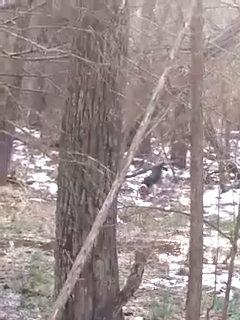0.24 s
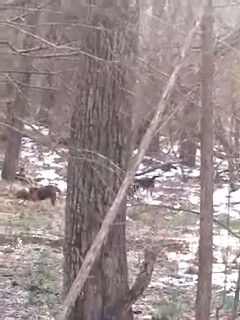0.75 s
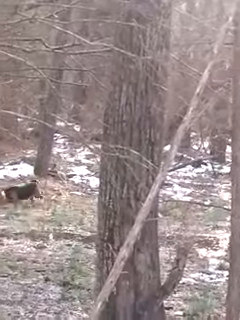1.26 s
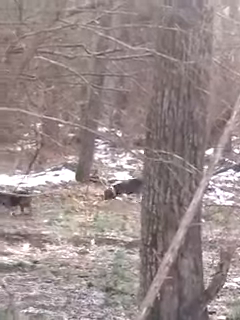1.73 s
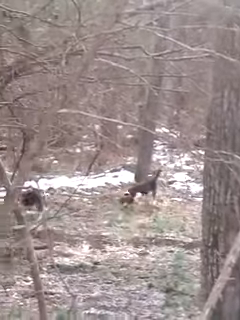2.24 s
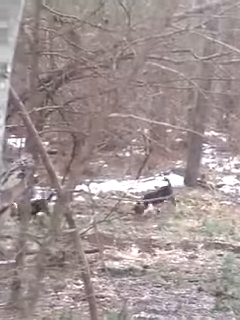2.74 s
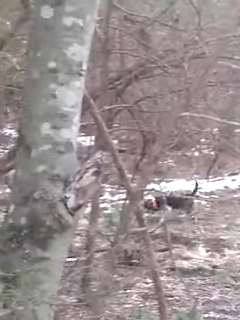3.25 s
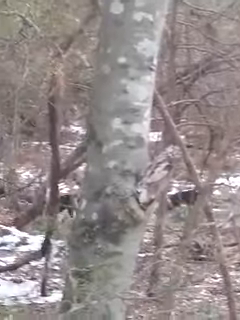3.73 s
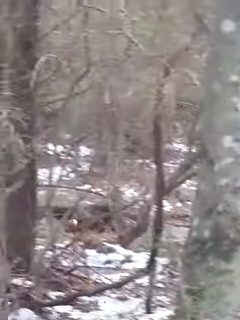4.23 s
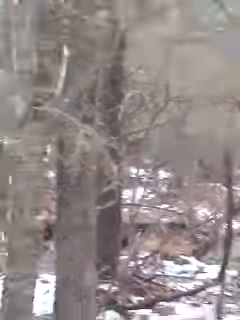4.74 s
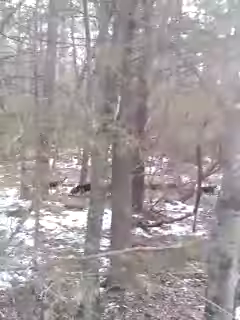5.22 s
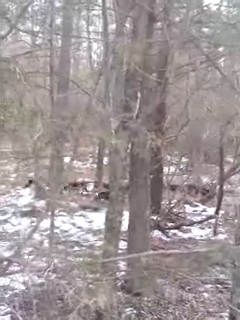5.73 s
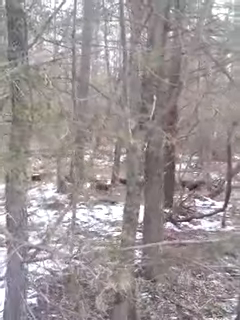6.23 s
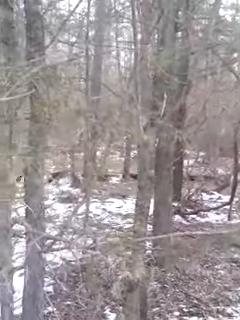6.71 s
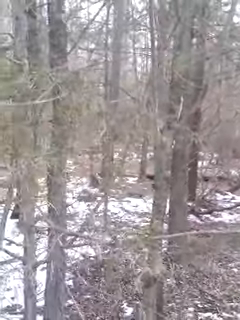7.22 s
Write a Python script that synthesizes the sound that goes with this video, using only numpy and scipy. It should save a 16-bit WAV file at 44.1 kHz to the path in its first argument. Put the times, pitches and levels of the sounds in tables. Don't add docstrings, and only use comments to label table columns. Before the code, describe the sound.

A pack of small hounds is already baying at the start, several voices overlapping at a distance in bare woodland. Howls hold around a mid-high pitch of 600 Hz, with husky yelps sliding above and hoarse barks breaking through. Strong bursts come at 0.9, 1.4 and 1.7 seconds, then a held howl at 2.0 and a yelping bark at 2.5. From about 2.8 to 4.5 the calls are mostly thinner, with a clear howl at 4.2 and the breeze lower. A sharp dry twig cracks very close at 4.55. The loudest clamour follows at 4.95 to 5.4, then bursts at 5.5, 5.8, 6.2 and 6.85, and a faint last yelp near 7.2. Trunks scatter every call into a diffuse ringing tail. Light breeze and hiss continue; small snaps and dull bumps come from the handheld microphone, whose loudest peaks are squashed and gritty.

```python
import sys
import numpy as np
from scipy import signal
from scipy.fft import rfft, irfft, next_fast_len
from scipy.io import wavfile
from scipy.ndimage import uniform_filter1d, minimum_filter1d

SR = 44100
rng = np.random.default_rng(int(sys.argv[2]) if len(sys.argv) > 2 else 0)


def attenuation_scalar(level_db):
    decades = np.asarray(level_db, float) / 20
    return 10 ** decades


def put_to_file(sound):
    columns = np.atleast_2d(sound).T
    safe = np.clip(columns, -1, 1)
    whole_steps = np.round(safe * 32767)
    wavfile.write(sys.argv[1], SR, whole_steps.astype(np.int16))


N = 329427

# time_s, pitch_hz, level_db, octave_level_db
WIDE_HOWLS = [
    [(.328, 553.6, -21.5, -28.5), (.373, 599.7, -12.5, -12.5), (.5, 619.8, -13, -29),
     (.6, 576.8, -20.5, -24), (.67, 539.4, -24.5, -22), (.71, 541.8, -38, -40)],
    [(1.35, 538.8, -27, -33.5), (1.375, 587, -7, -19), (1.402, 618.5, -8, -18), (1.425, 631.2, -9.5, -31),
     (1.528, 611.3, -12.5, -46), (1.58, 553.6, -24.5, -37), (1.61, 566, -30.5, -42)],
    [(2.865, 505.1, -34.5, -34), (2.905, 613.3, -13.5, -19.5), (2.94, 657.5, -12.5, -8.5),
     (2.97, 650.5, -15.5, -15), (3.0, 613, -23, -25.5), (3.04, 597, -31, -37)],
    [(3.668, 529.3, -28, -52), (3.74, 599.7, -23.5, -14), (3.77, 610.3, -18, -15),
     (3.8, 610.4, -15.5, -12.5), (3.85, 602.8, -21, -19.5), (3.875, 591, -33, -37.5)],
    [(4.17, 537.2, -31, -35.5), (4.215, 610.5, -16.5, -12), (4.26, 621.9, -16.5, -27),
     (4.32, 624, -9.5, -38), (4.42, 614.3, -18, -46), (4.5, 589.7, -29.5, -51.5)],
]
THROAT_RING_DB = [-1.5, 5, -5, -9, -4.5]
WIDE_OVERTONES_DB = [0.5, -16, -8.5]
# start_s, length_s, top_pitch_hz, level_db, overtones_db
NARROW_HOWLS = [(-.05, .25, 582.8, -16, -15.5), (0.93, .22, 607.4, -13.5, -17),
                (2.03, .345, 636, -8.5, -30), (2.36, .045, 600, -15, -20), (2.4, .07, 610, -18, -20),
                (3.03, .49, 626.3, -27, -13), (4.56, .17, 608.6, -16.5, -22), (5.03, .24, 630.5, -9, -22),
                (5.235, .16, 641.8, -6.5, -32.5), (5.517, .09, 600, -11.5, -23), (5.82, .18, 605, -14, -23),
                (6.218, .44, 620.5, -19.5, -11), (6.852, .12, 621.5, -17, -22)]
# scoop_share, scoop_s, sag_share, rise_s, fade_db, closing_db
NARROW_ARCH = (0.09, 0.03, 0.0747, 0.1446, -11.5, -4)
NARROW_OVERTONES_DB = [0, -12.5, -7]
# start_s, length_s, first_pitch_hz, last_pitch_hz, level_db
YELPS = [(.04, .16, 792.9, 641.2, -14.5), (.37, .12, 736, 822, -19), (.47, .15, 826.2, 759.2, -15),
         (.845, .12, 780.2, 624.1, -9), (.95, .2, 650.3, 680, -10), (1.675, .15, 799, 669, -11),
         (1.795, .22, 680, 710.4, -8), (2.525, .035, 681, 951, -10.5), (2.555, .04, 861, 778.2, -9.5),
         (3.225, .045, 859.6, 829, -11), (4.96, .06, 1000, 830, -13), (5.0, .11, 880, 700, -8),
         (5.56, .12, 700.1, 670.9, -13), (6.155, .1, 783.7, 668.2, -10), (6.24, .11, 763.1, 799.9, -13.5),
         (6.895, .1, 799.4, 660.7, -12), (6.99, 0.055, 860, 920, -16.5), (7.185, .08, 802.7, 753.4, -26.5)]
# start_s, length_s, first_pitch_hz, last_pitch_hz, level_db
WHINES = [(1.29, .07, 960, 1130, -19), (3.87, .06, 950, 900, -27), (3.86, 0.083, 680, 510, -33),
          (1.2, .11, 770, 950, -13), (1.955, .08, 760, 960, -17), (4.52, 0.22, 700, 820, -31.5),
          (5.075, .06, 950, 940, -19), (5.13, .05, 930, 1100, -17), (5.31, .11, 960, 1050, -25),
          (1.76, 0.18, 1300, 1300, -26), (6.222, 0.027, 3400, 3560, -34.5),
          (6.24, 0.045, 3350, 3250, -33.5), (6.23, .06, 2900, 2850, -33), (5.785, .04, 1350, 1560, -38),
          (5.79, .08, 510, 590, -29), (1.13, .075, 680, 700, -6.5), (1.2, .045, 690, 700, -11),
          (5.04, 0.066, 1200, 1260, -21), (2.032, .033, 1170, 1175, -13), (4.7, .04, 1050, 1100, -26.5),
          (6.17, .05, 880, 1000, -15), (2.33, .1, 1180, 1090, -24)]
# start_s, length_s, first_pitch_hz, last_pitch_hz, level_db
SQUEALS = [
    (4.21, .09, 1094, 940, -25),
    (6.59, .055, 1071, 1101, -30),
    (4.955, .05, 1134, 1133, -24),
    (6.165, .05, 1123, 1090, -25.5),
]
# start_s, end_s, half_pitch_hz, line_1_db, line_3_db, line_5_db
DOUBLED = [
    (4.24, 4.39, 311, -40, -15, -31),
    (5.08, 5.25, 318, -43, -34, -38),
]
# start_s, length_s, first_hz, last_hz, level_db
OVERTONE_FLARES = [(0, 0.0537, 1714, 1673, -33.5), (0.031, 0.049, 1080, 1131, -24),
                   (0.851, 0.0302, 2103, 2303, -38.5), (0.89, 0.0505, 1152, 1129, -15.5),
                   (1.0, 0.051, 853, 901.4, -23), (1.0, 0.073, 1800, 1746, -34.5),
                   (1.05, 0.05, 2344, 2329, -41.5), (1.054, 0.0414, 2880, 2883, -40),
                   (1.675, 0.025, 2242, 2394, -28.5), (1.674, 0.0245, 2998, 3173, -36),
                   (1.751, 0.0283, 3269, 3380, -39), (1.829, 0.073, 1667, 1703, -34),
                   (1.96, 0.0613, 2084, 2334, -36), (1.969, 0.056, 2988, 3220, -42),
                   (2.1, 0.1025, 1880, 1825, -37), (2.299, 0.124, 1788, 1767, -36.5),
                   (2.37, 0.0456, 2303, 2195, -40), (2.534, 0.0203, 2192, 2289, -29),
                   (2.621, 0.036, 1921, 1921, -31), (3.065, 0.0247, 850, 953, -17.5),
                   (3.25, 0.11, 1810, 1790, -35), (4.201, 0.0295, 4242, 4197, -42),
                   (3.73, 0.12, 1800, 1815, -29), (4.958, 0.0355, 2692, 2594, -32),
                   (4.96, 0.05, 2278, 2250, -26), (5.04, 0.043, 1868, 1892, -30.5),
                   (5.101, 0.066, 1580, 1579, -32.5), (5.125, 0.0392, 2373, 2361, -28.5),
                   (5.15, 0.035, 2145, 2142, -32), (5.23, 0.051, 1721, 1771, -34),
                   (5.37, 0.0515, 1030, 1080, -24), (5.53, 0.0412, 1856, 1834, -26),
                   (5.695, 0.0278, 829.3, 833.6, -22.5), (5.809, 0.0398, 2118, 2211, -36),
                   (6.16, 0.052, 2270, 2218, -28), (6.26, 0.049, 2327, 2328, -27),
                   (6.499, 0.0603, 2460, 2333, -32), (6.84, 0.046, 2900, 2850, -31),
                   (6.99, 0.0513, 1416, 1436, -31), (5.984, 0.0427, 1029, 1011, -29.5)]
# start_s, length_s, first_hz, last_hz, level_db
MORE_OVERTONE_FLARES = [(.04, .03, 2800, 3300, -42), (.09, .11, 1000, 880, -19), (.1, .09, 770, 720, -14),
                        (.333, .03, 2750, 2900, -30), (.333, .03, 3300, 3400, -35), (.36, .055, 3000, 3050, -28),
                        (.39, .045, 3600, 3700, -37), (4.943, .035, 1100, 960, -18), (4.6, .1, 5050, 5120, -49),
                        (1.41, .06, 3300, 2900, -31), (.34, .07, 2230, 2450, -26), (.345, .05, 1720, 1850, -27),
                        (1.22, .1, 1950, 2500, -33), (1.3, .05, 3200, 3400, -44), (1.91, .05, 1350, 1300, -26),
                        (2.41, .025, 1200, 1150, -27), (2.875, .025, 2700, 2850, -39),
                        (2.875, .025, 3300, 3450, -39), (3.07, .025, 3050, 3050, -38),
                        (3.07, .02, 3450, 3450, -41), (4.195, .13, 1830, 1870, -28),
                        (5.61, .06, 2900, 2750, -38), (5.86, .04, 2750, 2900, -43), (6.26, .08, 4750, 4950, -49),
                        (1.355, .055, 1680, 1850, -27), (6.33, .17, 3080, 3020, -43),
                        (6.43, .1, 4700, 5300, -51), (6.46, .1, 4100, 4250, -49), (7.375, .095, 1800, 1770, -36)]
# start_s, length_s, first_hz, last_hz, level_db
VOICE_BREAKS = [(0.06, 0.12, 836, 782.5, -16), (0.7, 0.04, 888.6, 889.5, -23.5),
                (0.871, 0.06, 1244, 1147, -15), (0.87, 0.06, 2262, 2253, -29.5),
                (0.88, 0.05, 3047, 2924, -34), (1.401, 0.06, 2640, 2236, -23.5),
                (1.42, 0.05, 1102, 950.4, -22), (1.701, 0.06, 2247, 2000, -30),
                (1.961, 0.06, 1397, 1302, -28.5), (2.528, 0.04, 2600, 2950, -31),
                (2.545, 0.05, 894, 744.3, -15.5), (2.555, 0.055, 3090, 3380, -34),
                (2.749, 0.04, 772.6, 723, -24.5), (3.07, 0.05, 930.4, 925, -18),
                (3.469, 0.05, 953.6, 811.5, -22), (3.72, 0.04, 1401, 1504, -28.5),
                (3.719, 0.05, 2498, 2700, -32.5), (3.85, 0.025, 1001, 902, -24),
                (3.849, 0.025, 2300, 2300, -31.5), (4.19, 0.08, 2284, 2394, -29),
                (4.251, 0.25, 5310, 5410, -51), (4.26, 0.2, 4200, 4312, -51.5),
                (2.555, 0.055, 2500, 2300, -30), (4.95, 0.04, 1163, 1258, -23.5),
                (5.0, 0.08, 1297, 1103, -25), (5.51, 0.06, 2696, 2200, -23.5),
                (5.52, 0.05, 1122, 922, -21.5), (5.601, 0.067, 5910, 5680, -51),
                (6.84, 0.06, 1350, 1150, -18), (6.17, 0.05, 2582, 2506, -29.5),
                (6.2, 0.05, 5770, 5550, -49.5), (6.27, 0.065, 4880, 4810, -46),
                (6.43, 0.17, 4870, 5330, -50), (6.835, 0.08, 1304, 800.7, -14),
                (6.84, 0.06, 2239, 2236, -27.5), (6.9, 0.1, 2200, 1813, -33.5),
                (7.201, 0.05, 2414, 2220, -39), (7.381, 0.09, 1190, 1240, -35.5)]
# start_s, length_s, effort_db, brightness_db, rasp_db
BARKS = [(.035, .14, -13, -8, -29.5), (.335, 0.19, -20, 3, -30), (.85, .24, -9, -3, -30.5),
         (1.355, 0.17, -19.5, 14, -21), (1.67, 0.16, -12, -0.5, -36), (2.52, .13, -11, -4, -52),
         (2.87, 0.18, -28, 10, -13.5), (3.05, .15, -10.5, -8, -36.5), (3.68, 0.31, -24.5, 5, -23),
         (4.175, .24, -18, 2.5, -24.5), (4.945, .22, -7.5, -7, -37), (5.505, .24, -9.5, -3, -36.5),
         (6.155, .26, -9.5, -6, -31.5), (6.825, .25, -11.5, -3, -35.5), (7.185, 0.16, -23.5, -4, -46.5)]
# start_s, length_s, effort_db, brightness_db, rasp_db
CLAMOUR = [(0.0, 0.053, -23.5, -8, -13.5), (.08, .14, -18, -22, -30), (.46, .3, -26, -13.5, -20),
           (1.04, .31, -26.5, -8.5, -21), (1.45, .19, -19.5, -12.5, -35.5), (1.77, .29, -15, -18, -28.5),
           (2.03, .16, -24.5, -5, -20), (2.18, .25, -18.5, -15, -25), (2.6, .2, -19, -22.5, -46),
           (3.13, .4, -19, -15.5, -41.5), (4.36, .39, -30.5, -11, -18), (5.14, .33, -22, -12, -28.5),
           (5.79, .3, -34, -5, -21.5), (6.36, .3, -33, 0, -19), (7.29, 0.2, -31, -19.5, -41.5)]
# rise_s, fade_db, fade_bend, mouth_hz, mouth_sag_share, dulling_db
BARK_MOVE = (0.07, -20, 1.52, 920, 0.24, -16)
# rise_s, fade_db, fade_bend, mouth_hz, mouth_sag_share, dulling_db
CLAMOUR_MOVE = (0.096, -11, 5.0, 960, 0.046, -1)
# centre_hz, width_hz, level_db
THROAT = [(1190, 760, -8), (1854.8, 130, 2), (2222.3, 186, 1.5), (2806.4, 180, -5), (3116, 100, -5.5)]
# centre_hz, width_hz, level_db
TEETH = [(4250, 1900, 0.5), (5300, 580, -1), (6615, 2500, -2.5), (8400, 300, -26)]
# frequency_hz, t60_s
WOODS_DECAY = [(300, 0.798), (700, 0.791), (1500, 0.55), (3000, 0.497), (8000, 0.688)]
# frequency_hz, share
PHASE_LEAD = [(60, .3), (600, .6), (2000, .2), (4000, .2), (9000, .1)]
# frequency_hz, side_minus_mid_db
STEREO_WIDTH = [(60, -8), (125, -12), (250, -5), (600, -26), (1000, -15), (2000, 0.5), (4000, -3),
                (8000, 0.5), (12000, 1)]
# frequency_hz, left_minus_right_db
PORT_LEAN = [(30, -3), (125, 1.5), (250, -.6), (1000, -1.2), (2500, 4), (5000, -7), (9000, 0), (13000, 2)]
# start_s, level_db, decay_s
TWIG = (4.548, -11, .001)
# start_s, level_db, pitch_hz, length_s
BUMPS = [
    (0.005, -42.5, 61.7, 0.012),
    (0.885, -44.5, 59.9, 0.02),
    (.906, -36.5, 60, .02),
    (1.399, -58, 90.8, .08),
    (4.385, -46, 164.7, 0.02),
]
# start_s, level_db, length_s, low_edge_hz
SNAPS = [(0.87, -41, 0.07, 2993), (1.385, -34.5, 0.1, 3013), (1.814, -46.5, 0.00771, 5100),
         (2.197, -56, .006, 3000), (3.622, -56, .008, 3007), (2.397, -47, 0.0068, 3430),
         (2.862, -39, 0.006, 3040), (4.389, -33.5, 0.085, 2500), (6.212, -40, 0.054, 3020),
         (6.795, -48, 0.0054, 905), (4.511, -51.5, 0.007, 3207)]
# frequency_hz, density_db_per_hz
AIR_COLOUR = [(25, -37.5), (45, -23.5), (75, -1), (105, -5), (160, -1), (250, 1.5), (400, 3), (800, -7),
              (2000, -5), (4000, -14.5), (6300, -24.5), (8000, -25), (10000, -19), (14000, -25)]
# time_s, level_db
BREEZE = [
    (0, 1),
    (2.3, 1.5),
    (2.7, -5),
    (4.1, -4),
    (4.5, 1),
    (7.5, 1.5),
]

HOWL_FALL_DB, YELP_FALL_DB = 13, 22
QUIET_DB = -12
YELP_SETTLE, YELP_RISE_S, YELP_FADE_DB, YELP_OCTAVE_DB = 2.524, 0.016, -9, -29
WHINE_SETTLE, WHINE_OCTAVE_DB, SQUEAL_OCTAVE_DB = .1, -26, -3
MOUTH_WIDTH_HZ, BREAK_WIDTH_HZ = 493.4, 440
BARK_DB, STRANDS_DB = -2.5, -2
RASP_LINGER, OPENING_S, OPENING_DB = 0.647, 0.026, -12.5
WIDE_HZ_PER_DB = 11
WOODS_DB, AIR_DB = -10.5, -46
LOUD_DB = -21


def pack():
    mix = np.zeros(N)
    howls = [wide_howl(*call) for call in zip(WIDE_HOWLS, THROAT_RING_DB)]
    howls += [narrow_howl(row, *NARROW_ARCH) for row in NARROW_HOWLS]
    for rows in howls:
        add(mix, *voice(rows, jitter=.009, shimmer_db=1.5, fall_db=HOWL_FALL_DB))
    for calls, settle, octave_db in [(YELPS, YELP_SETTLE, YELP_OCTAVE_DB),
                                     (WHINES, WHINE_SETTLE, WHINE_OCTAVE_DB),
                                     (SQUEALS, WHINE_SETTLE, SQUEAL_OCTAVE_DB)]:
        for row in calls:
            rows = yelp(row, settle, octave_db)
            add(mix, *voice(rows, jitter=.025, shimmer_db=2.6, fall_db=YELP_FALL_DB))
    for row in DOUBLED:
        add(mix, *doubled_folds(*row))
    for flares in (OVERTONE_FLARES, MORE_OVERTONE_FLARES):
        for row in flares:
            add(mix, *overtone_flare(*row))

    hoarse = np.zeros(N)
    for row in VOICE_BREAKS:
        add(hoarse, *voice_break(*row))
    for calls, move in [(BARKS, BARK_MOVE), (CLAMOUR, CLAMOUR_MOVE)]:
        for row in calls:
            add(hoarse, *bark(bark_gesture(row, *move)))
    return mix + coloured(hoarse, lambda hz: 1 / np.sqrt(1 + (530 / (hz + 1)) ** 14))


def wide_howl(rows, ring_db):
    s, hz, db, octave_db = np.transpose(rows)
    upper = [octave_db + ring_db + step for step in WIDE_OVERTONES_DB[1:]]
    return np.transpose([s, hz, db, octave_db, *upper])


def narrow_howl(row, scoop, scoop_s, sag, rise_s, fade_db, closing_db):
    start, length, hz, db, open_db = row
    t = np.linspace(0, length, num=24)
    pitch = hz * (1 - scoop * np.exp(-t / scoop_s) - sag * (t / length) ** 2.5)
    level = db + effort(t, rise_s, fade_db, 3.99)
    mouth = open_db + closing_db * t / length - 12 * np.exp(-t / scoop_s)
    upper = [level + mouth + step for step in NARROW_OVERTONES_DB]
    return np.transpose([start + t, pitch, level, *upper])


def yelp(row, settle, octave_db):
    start, length, first_hz, last_hz, db = row
    t = np.linspace(0, length, num=16)
    slide = np.expm1(-settle * t / length) / np.expm1(-settle)
    level = db + effort(t, YELP_RISE_S, YELP_FADE_DB, 5.01)
    return np.transpose([start + t, first_hz + (last_hz - first_hz) * slide, level, level + octave_db])


def voice(rows, jitter, shimmer_db, fall_db):
    s, (hz, *levels) = curves(rows)
    turns = np.cumsum(hz * (1 + jitter * wobble(len(hz), 150))) / SR
    levels += [levels[-1] - fall_db * k ** .6 for k in range(1, 8)]
    sound = np.zeros(len(hz))
    for k, db in enumerate(levels, 1):
        swell = attenuation_scalar(db + shimmer_db * np.sqrt(k) * wobble(len(hz), 90))
        sound += swell * np.sin(2 * np.pi * k * turns + k * k)
    return s, np.sqrt(2) * sound * fade(len(hz))


def doubled_folds(start, end, hz, *levels):
    t = np.arange(0, end - start, 1 / SR)
    turns = np.cumsum(hz * (1 + 0.017 * wobble(len(t), 100))) / SR
    lines = sum(attenuation_scalar(db) * np.sin(2 * np.pi * (2 * k + 1) * turns) for k, db in enumerate(levels))
    return start, lines * signal.windows.tukey(len(t), .4)


def overtone_flare(start, length, first_hz, last_hz, db):
    hz = np.linspace(first_hz, last_hz, round(length * SR))
    turns = np.cumsum(hz * (1 + .012 * wobble(len(hz), 150))) / SR
    swell = attenuation_scalar(db + 2.5 * wobble(len(hz), 70)) * signal.windows.tukey(len(hz), .6)
    return start, np.sqrt(2) * swell * np.sin(2 * np.pi * turns)


def voice_break(start, length, first_hz, last_hz, db):
    hz = np.linspace(first_hz, last_hz, round(length * SR))
    slaps = rng.standard_normal(len(hz)) * attenuation_scalar(2.5 * wobble(len(hz), 250))
    sound = evened(resonate(slaps, hz, BREAK_WIDTH_HZ))
    return start, attenuation_scalar(db) * sound * signal.windows.tukey(len(hz), .5)


def bark_gesture(row, rise_s, fade_db, bend, mouth_hz, sag, dulling_db):
    start, length, db, bright_db, rasp_db = row
    t = np.linspace(0, length, num=30)
    shape = effort(t, rise_s, fade_db, bend)
    opening = OPENING_DB * np.maximum(1 - t / OPENING_S, 0) + dulling_db * (t / length) ** 0.722
    mouth = (mouth_hz + WIDE_HZ_PER_DB * bright_db) * (1 - sag * t / length)
    return np.transpose([start + t, db + shape, mouth, bright_db + opening, rasp_db - RASP_LINGER * shape])


def bark(rows):
    s, (effort_db, mouth_hz, bright_db, rasp_db) = curves(rows)
    count = len(effort_db)
    turns = np.cumsum(.37 * mouth_hz * (1 + .08 * wobble(count, 60))) / SR
    pulses = np.diff(np.floor(turns), prepend=0) * (1 + 0.49 * rng.standard_normal(count))
    puffs = evened((.5 + np.exp(-(turns % 1) / .3)) * rng.standard_normal(count))
    drive = (.5 * evened(pulses) + .5 * puffs) * attenuation_scalar(2.0 * wobble(count, 35))
    mouth = evened(resonate(drive, mouth_hz, MOUTH_WIDTH_HZ))
    throat = restless(drive, THROAT, drift=.05, swing_db=4.0)
    rasp = restless(drive, TEETH, drift=.07, swing_db=3.5)
    sound = mouth + attenuation_scalar(STRANDS_DB) * strands(mouth_hz, bright_db)
    sound += attenuation_scalar(bright_db) * throat + attenuation_scalar(rasp_db) * rasp
    return s, attenuation_scalar(effort_db + BARK_DB) * sound * fade(count)


def restless(drive, modes, drift, swing_db):
    count, sound = len(drive), 0
    for k, (hz, width, db) in enumerate(modes):
        swell = attenuation_scalar(db + swing_db * wobble(count, 16))
        wandering_hz = hz * (1 + drift * wobble(count, 7.5))
        sound = sound + (-1) ** k * swell * resonate(drive, wandering_hz, width)
    return evened(sound)


def strands(mouth_hz, bright_db):
    count, sound = len(mouth_hz), 0
    upper_gain = attenuation_scalar(np.minimum(bright_db, -4) - 5)
    for ratio in rng.uniform([.72, .92, 1.12], [.88, 1.08, 1.35]):
        unsteady = 1 + .04 * wobble(count, 9) + .03 * wobble(count, 120)
        turns = np.cumsum(ratio * mouth_hz * unsteady) / SR
        upper = 0
        for k in (2, 3):
            throat = 1 / (1 + (k * ratio * mouth_hz / 2700) ** 10)
            upper = upper + throat * np.sin(2 * np.pi * k * turns)
        sound = sound + attenuation_scalar(5.0 * wobble(count, 16)) * (np.sin(2 * np.pi * turns) + upper_gain * upper)
    return evened(sound)


def effort(t, rise_s, fade_db, bend):
    return QUIET_DB * np.maximum(1 - t / rise_s, 0) + fade_db * (t / t[-1]) ** bend


def woods(x):
    tail, other = (attenuation_scalar(WOODS_DB) * scatter(0.684) for _ in range(2))
    alike = x + signal.fftconvolve(x, tail)[:N]
    other[:SR] += scatter(18)[:SR]
    return alike, signal.fftconvolve(x, other)[:N]


def scatter(speed):
    taps = np.zeros(2 * SR)
    at = np.arange(300, 2 * SR - 20, 20)
    taps[at + rng.integers(0, 20, len(at))] = rng.choice([-1., 1.], len(at))
    hz, t, z = signal.stft(taps, SR, nperseg=256)
    decay = attenuation_scalar(-60 * speed * t / read(WOODS_DECAY, hz)[:, None])
    tail = signal.istft(z * decay, SR, nperseg=256)[1]
    return tail / np.linalg.norm(tail)


def twig():
    s, db, decay = TWIG
    t, mix = np.arange(0, 8 * decay, 1 / SR), np.zeros(N)
    splinter = 3.2 * np.exp(-t * 14000) + .5 * rng.standard_normal(len(t))
    add(mix, s, attenuation_scalar(db) * splinter * np.exp(-t / decay))
    return coloured(mix, lambda hz: hz / (hz + 90) / np.sqrt(1 + (hz / 5000) ** 3))


def handling():
    mix = np.zeros((2, N))
    for s, db, hz, length in BUMPS:
        t = np.arange(0, 3 * length, 1 / SR)
        shape = t / length * np.exp(-3 * t / length)
        thud = resonate(rng.standard_normal(len(t)), hz, 6.3 * hz)
        for side in mix:
            add(side, s, attenuation_scalar(db) * evened(thud * shape))
    for s, db, length, low_hz in SNAPS:
        t = np.arange(0, 2 * length, 1 / SR)
        edge = signal.butter(2, [low_hz, 13000], "band", fs=SR)
        for side in mix:
            crackle = rng.standard_normal(len(t)) * np.exp(-4 * t / length) * attenuation_scalar(5.1 * wobble(len(t), 1500))
            add(side, s, attenuation_scalar(db) * signal.lfilter(*edge, crackle))
    return mix


def air():
    noise = coloured(rng.standard_normal((2, N)), lambda hz: attenuation_scalar(read(AIR_COLOUR, hz)))
    low = coloured(noise, lambda hz: 1 / (1 + (hz / 450) ** 4))
    breeze_db = np.interp(np.arange(N) / SR, *np.transpose(BREEZE))
    lumps = attenuation_scalar(3.0 * wobble(N, 7) + breeze_db)
    return attenuation_scalar(AIR_DB) * evened(noise + (lumps - 1) * low)


def evened(x):
    return x / np.sqrt(np.mean(x ** 2) + 1e-20)


def read(points, hz):
    f, value = np.transpose(points)
    return np.interp(np.log(hz + 1), np.log(f + 1), value)


def add(mix, s, sound):
    sound = sound[max(round(-s * SR), 0):]
    part = mix[max(round(s * SR), 0):][:len(sound)]
    part += sound[:len(part)]


def curves(rows):
    s, *columns = np.transpose(rows)
    t = np.arange(s[0], s[-1], 1 / SR)
    return s[0], [np.interp(t, s, c) for c in columns]


def wobble(count, per_s):
    span = max(round(SR / per_s), 2)
    return evened(uniform_filter1d(uniform_filter1d(rng.standard_normal(count), span), span))


def resonate(x, hz, width):
    turn = np.exp(2j * np.pi * np.cumsum(hz * np.ones(len(x))) / SR)
    r = np.exp(-np.pi * width / SR)
    smooth = signal.lfilter([(1 - r) ** 2], [1, -2 * r, r * r], x * turn.conj())
    return 2 * (turn * smooth).real


def coloured(x, gain):
    size = next_fast_len(x.shape[-1], True)
    return irfft(rfft(x, size) * gain(np.fft.rfftfreq(size, 1 / SR)), size)[..., :x.shape[-1]]


def fade(count):
    t = np.arange(count) / SR
    return np.sin(np.pi / 2 * np.minimum(1, t / .013) * np.minimum(1, t[::-1] / .015)) ** 2


def scene():
    alike, unlike = np.array(woods(pack())) + air()
    lead = lambda hz: np.clip(read(PHASE_LEAD, hz), 0, 1)
    side = coloured(alike, lambda hz: 1j * attenuation_scalar(read(STEREO_WIDTH, hz)) * lead(hz))
    side += coloured(unlike, lambda hz: attenuation_scalar(read(STEREO_WIDTH, hz)) * np.sqrt(1 - lead(hz) ** 2))
    return np.array([alike + side, alike - side]) + handling() + twig()


def starved(x):
    hz, t, z = signal.stft(x, SR, nperseg=1024)
    level_db = 10 * np.log10((abs(z) ** 2).sum((0, 1)) + 1e-12)
    patches = uniform_filter1d(rng.standard_normal((len(t), len(hz))), size=6, axis=1)
    patches = evened(uniform_filter1d(patches, size=3, axis=0)).T
    bar = np.clip(.25 * (level_db - LOUD_DB), -.3, 2.1)
    edge_hz = 8800 + 300 * evened(uniform_filter1d(rng.standard_normal(len(t)), size=4))
    dropped = (hz[:, None] > edge_hz) * (patches < bar) * (abs(t - TWIG[0]) > .012)
    return signal.istft(z * (1 - .97 * dropped), SR, nperseg=1024)[1][:, :N]


def top_cut(x):
    return signal.sosfilt(signal.butter(12, 14600, fs=SR, output="sos"), x)


def record(dry):
    top_edge = lambda hz: 1 / np.sqrt(1 + (hz / 14600) ** 60)
    lean = lambda hz: attenuation_scalar(np.outer([.5, -.5], read(PORT_LEAN, hz))) * top_edge(hz)
    ports = coloured(dry, lean)
    room = minimum_filter1d(1 / np.maximum(abs(ports).max(0), 1), size=301)
    held = np.clip(1.03 * ports * uniform_filter1d(room, size=301), -1, 1)
    mix = starved(held)
    return top_cut(mix)


dry = scene()
out = record(dry)
put_to_file(out)
```